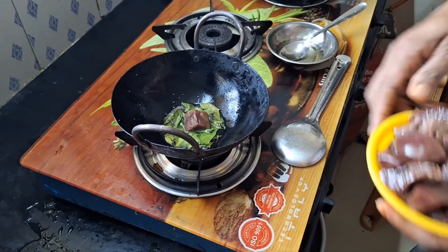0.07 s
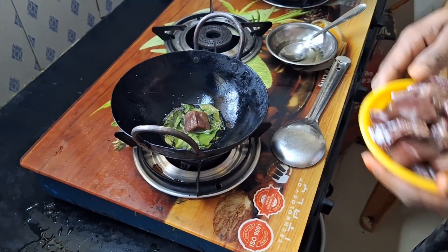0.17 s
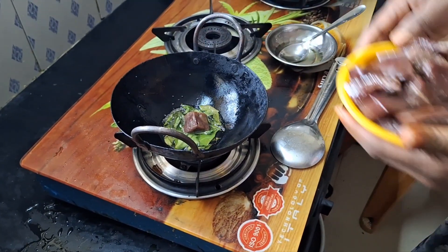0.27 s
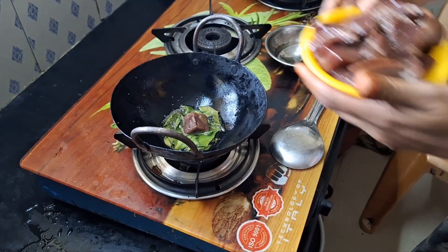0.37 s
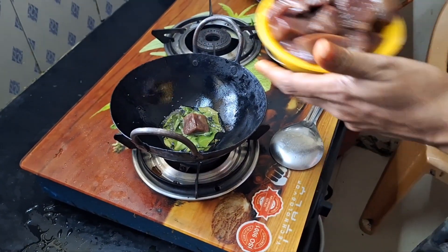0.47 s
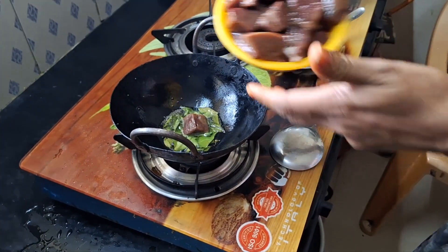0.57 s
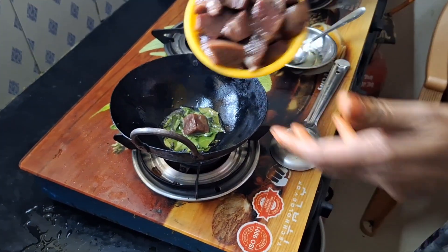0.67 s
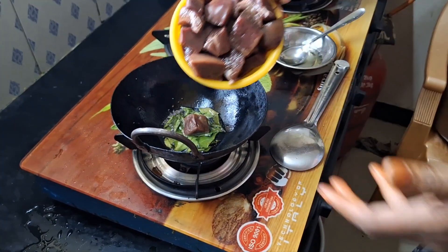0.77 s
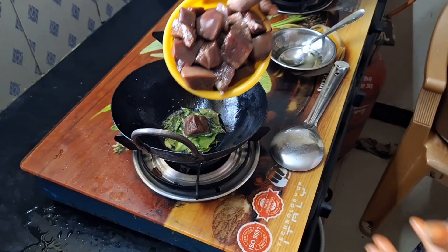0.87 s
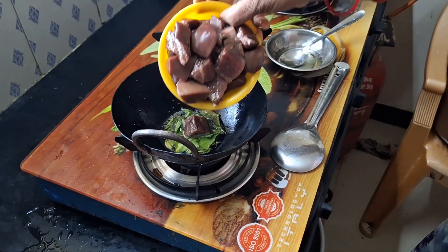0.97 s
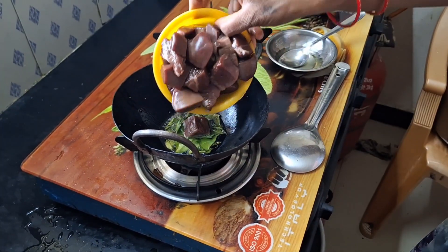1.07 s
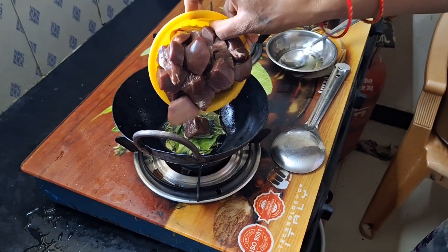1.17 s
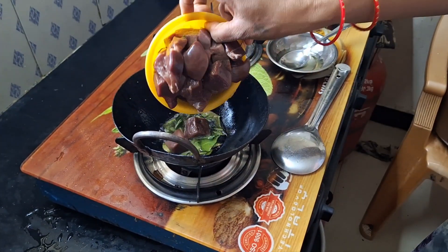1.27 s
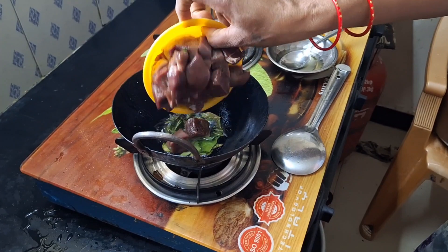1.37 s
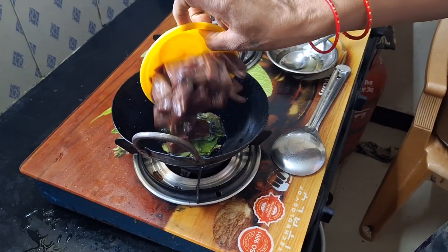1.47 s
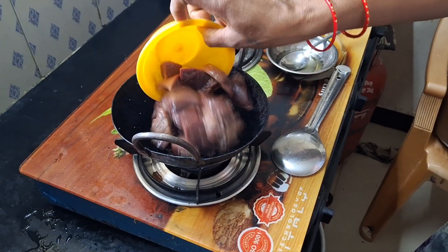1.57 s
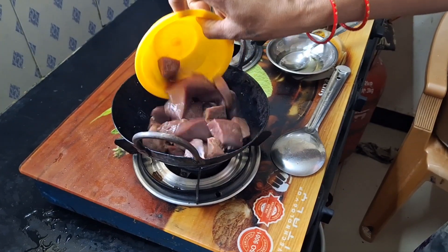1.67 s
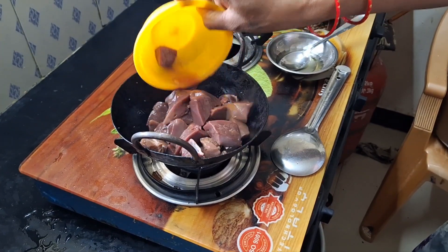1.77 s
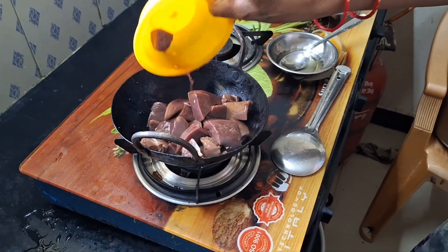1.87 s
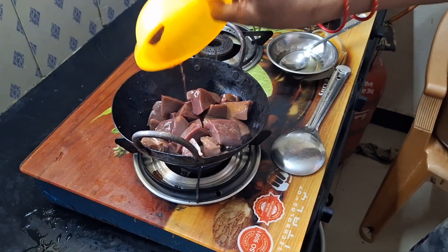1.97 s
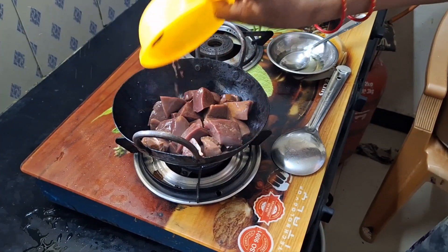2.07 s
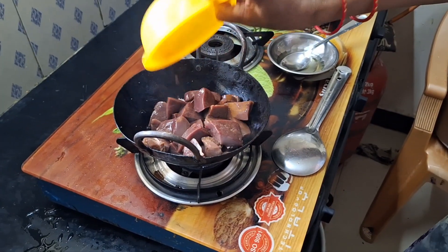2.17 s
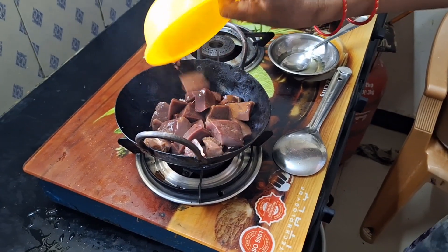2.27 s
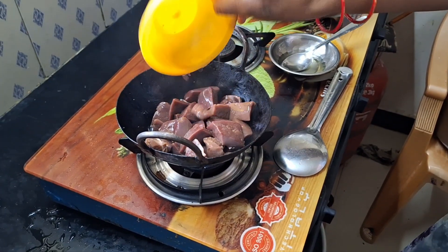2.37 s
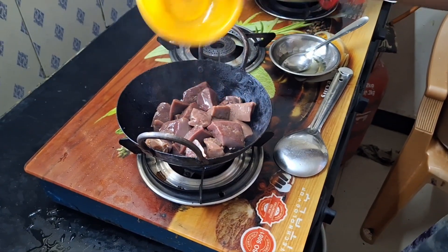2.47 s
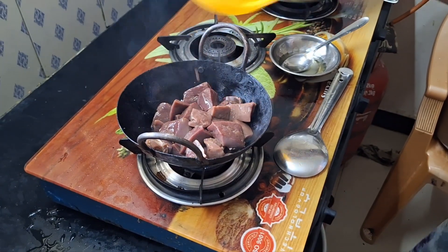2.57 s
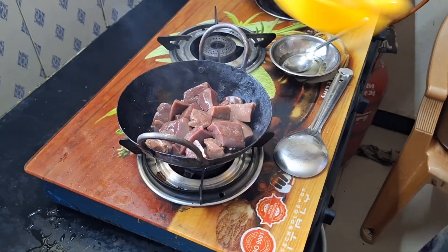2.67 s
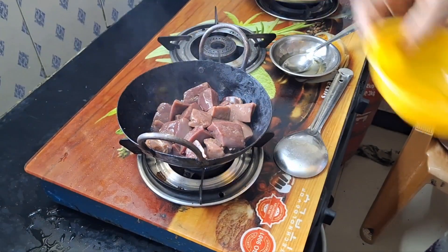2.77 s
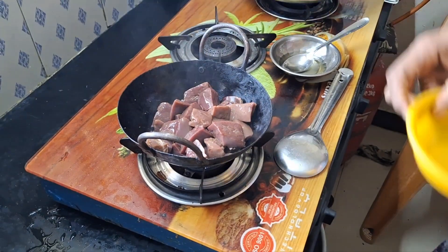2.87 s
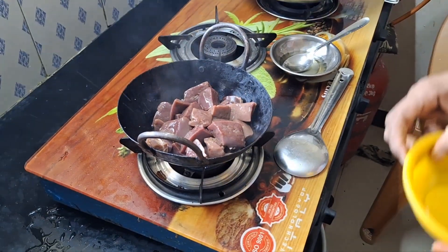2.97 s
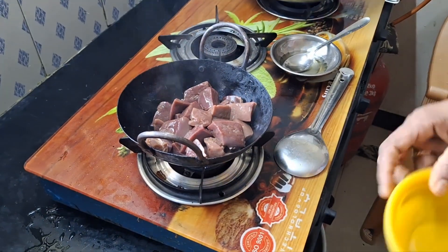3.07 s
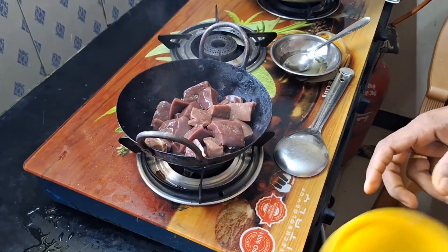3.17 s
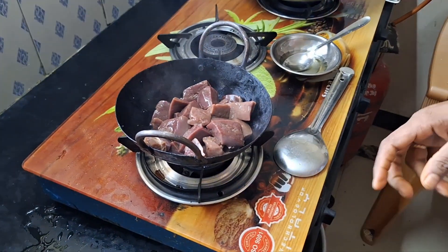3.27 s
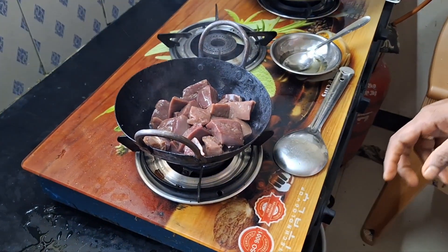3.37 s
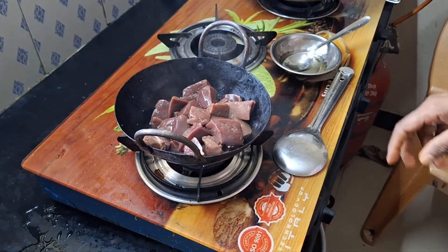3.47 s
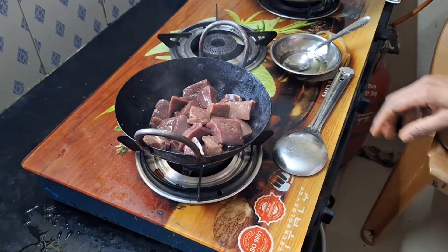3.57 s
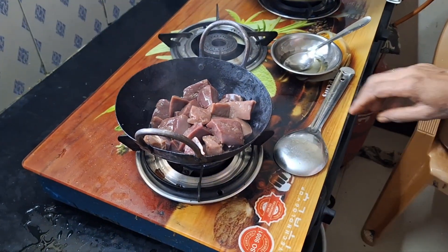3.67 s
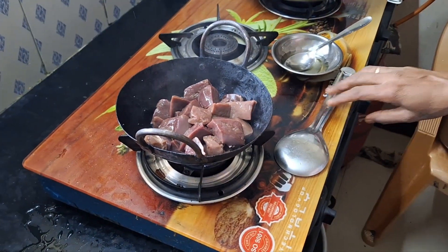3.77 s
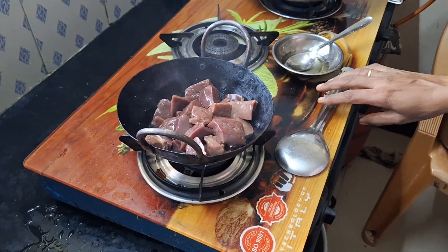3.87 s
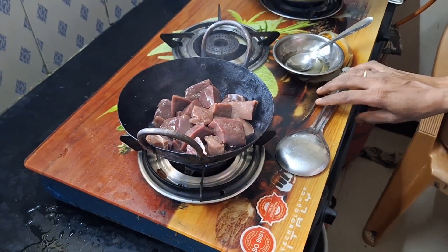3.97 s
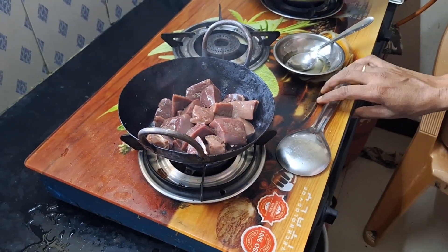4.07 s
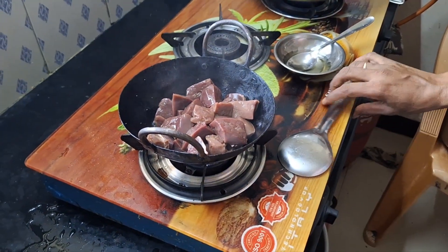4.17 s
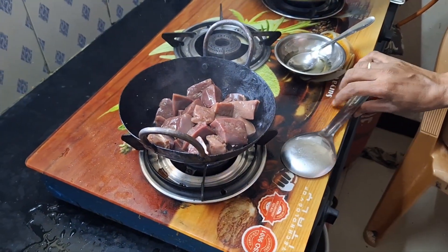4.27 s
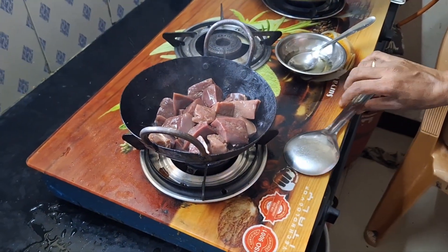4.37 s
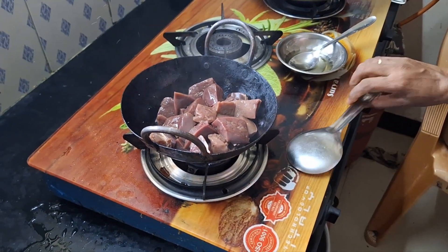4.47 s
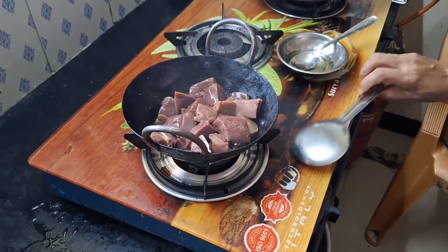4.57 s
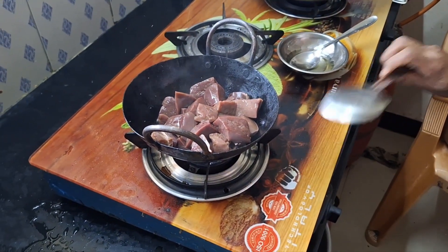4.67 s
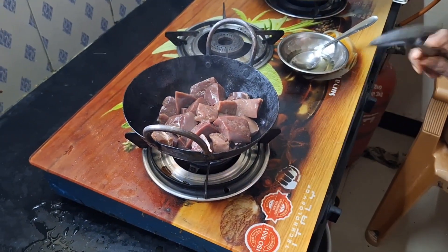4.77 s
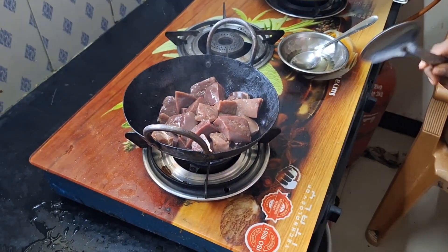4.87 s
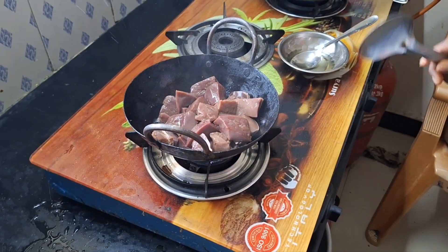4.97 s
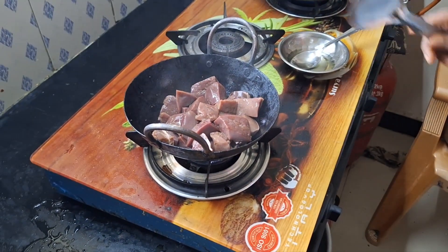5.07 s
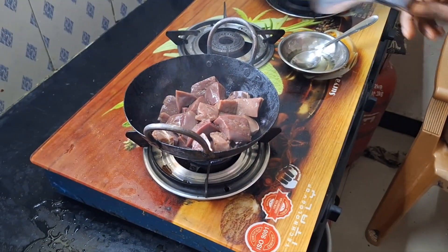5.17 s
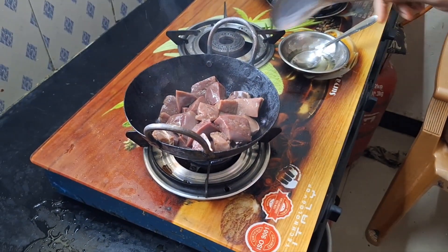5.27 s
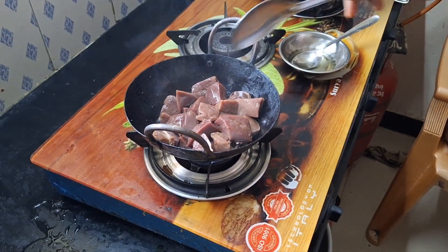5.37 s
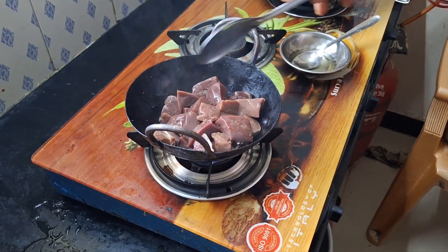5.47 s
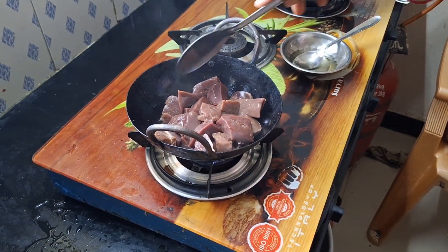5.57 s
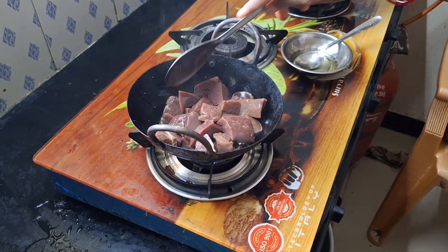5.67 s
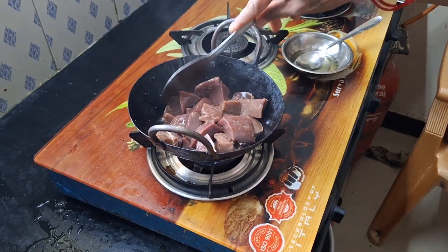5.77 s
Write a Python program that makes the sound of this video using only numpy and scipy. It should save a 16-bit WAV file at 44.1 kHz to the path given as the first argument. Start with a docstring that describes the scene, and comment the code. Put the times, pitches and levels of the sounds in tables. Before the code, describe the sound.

Hot oil ticks and spits single pops in an iron wok over the low hum of a small kitchen. Pieces of raw meat slide in from a bowl and land with a wet slap, bursting into a loud, dense sizzle. The frying carries on close by with sharp pops and bubbling plops, easing slightly, while the bowl gives a few dull knocks.

```python
"""Single pops spit from hot oil in an iron wok, over the low hum of a small kitchen.
Then pieces of raw liver slide from a bowl and land with a wet slap. Their water flashes into steam,
making a dense sizzle that slowly calms, with plops of large bubbles and a few knocks of the bowl.
Every burst rattles round the wok and rings briefly in the room. An automatic gain control
turns everything down while the frying is loud, so the hum sinks."""
import sys
import numpy as np
from scipy import signal
from scipy.fft import rfft, irfft
from scipy.io import wavfile

SR = 44100
rng = np.random.default_rng(int(sys.argv[2]) if len(sys.argv) > 2 else 0)


def dump_mix(stems):
    """Bounce the given channels to the path in sys.argv[1] as a 16-bit WAV at rate SR."""
    frames = np.atleast_2d(stems).T  # one column per channel
    limited = np.clip(frames, -1, 1)  # hard clip at full scale
    pcm = np.round(limited * 32767).astype(np.int16)
    wavfile.write(sys.argv[1], SR, pcm)


N = 257233
TIME, HZ = np.arange(N) / SR, np.fft.rfftfreq(N, 1 / SR)


# Loudness of the sizzle over time, with two brief dips in level. Columns: time_s, level_db
SIZZLE_LOUDNESS = [(1.5, -47), (1.56, -32.5), (1.62, -30), (1.65, -16), (1.72, -16.5), (1.94, -17.5),
                   (1.98, -23.5), (2.04, -18), (2.19, -19.5), (2.24, -17), (2.34, -19.5), (2.39, -16.5),
                   (2.6, -17), (2.8, -17.5), (3.16, -17.5), (3.23, -20), (4.49, -20.5), (4.61, -23.5),
                   (4.65, -19), (4.71, -22.5), (4.74, -26), (4.78, -22.5), (4.96, -20), (5.41, -23),
                   (5.83, -22)]
def sizzle(landing_s=1.648, flash_fade_s=0.031, pool_full_s=2.25):
    """Water boils out of the meat: thin films snap, bubbles ring and steam squeaks."""
    level_db = np.interp(TIME, *np.transpose(SIZZLE_LOUDNESS), left=-100) + 0.4 * drift(20)
    snaps = in_wok(clicks(8000, spread_db=4.2))
    rings = in_wok(bubbles(389, 16170, spread_db=3.0, cycles=4.3, glide=0.062, count=24000))
    squeaks = in_wok(bubbles(940, 8510, spread_db=1.8, cycles=12.0, glide=0.031, count=600))
    frying = amp(-3.5) * snaps + amp(-3) * rings + amp(-12.5) * squeaks
    frying *= amp(0.7 * drift(45))  # steam escapes from under the meat in spurts
    # Large, low bubbles grow louder as juice gathers under the meat.
    pool_db = np.interp(TIME, [landing_s, pool_full_s], [-3.5, 0])
    frying += (amp(pool_db) - 1) * below(frying, 1400)
    # The wet surface flashes into fine fizz as it lands; the coarse bubbling comes in lumps.
    flash_db = 5 * np.exp(-since(landing_s) / flash_fade_s) * (TIME > landing_s)
    coarse = below(frying, 3500)
    coarse_db = -0.49 + 0.31 * flash_db + 0.94 * drift(21)
    frying = amp(coarse_db) * coarse + amp(0.5 + flash_db) * (frying - coarse)
    return spread_over_wok(amp(level_db) * frying, rattle_db=6.5, room_db=9.5)


def bubbles(low_hz, high_hz, spread_db, cycles, glide, count):
    """Steam bubbles ring as they burst, each with its own pitch, fade and slide in pitch."""
    when, pitch, life, bend, size = rng.random((count, 5)).T
    hz = low_hz + (high_hz - low_hz) * pitch
    fade_s = cycles * (0.086 + life) / hz
    height = strength(size, spread_db) / np.sqrt(fade_s)
    length = (4 * fade_s * SR).astype(int) + 1
    # Compute all bubbles end to end, then move each to its own start.
    which = np.repeat(np.arange(count), length)
    step = np.arange(len(which)) - (np.cumsum(length) - length)[which]
    age = step / SR / fade_s[which]
    slide = 1 + glide * (2 * bend[which] - 1) * age
    chirps = height[which] * np.sin(2 * np.pi * hz[which] * step / SR * slide) * np.exp(-age)
    start = (when * N).astype(int)
    return unit(np.bincount(start[which] + step, chirps, N)[:N])


# The tone of frying, from bass to treble. Columns: pitch_hz, level_db
FRYING_TONE = [(150, -58), (330, -22), (480, -10), (850, -12.5), (1080, -6.5), (1400, -7.5), (1700, -5.5),
               (2500, -0.7), (3100, -1.9), (3800, -1.5), (5800, -0.6), (7900, -0.5), (8700, -3.5),
               (10000, -1.5), (13000, -4.5), (16000, -6.5)]
# Pitches at which the hollow of the wok rings. Columns: pitch_hz, width_hz, level_db
WOK_RINGS = [(676, 36, -3), (1067, 73, -1), (1176, 78, -4.5), (2030, 130, -11.5), (2470, 260, -10)]
def in_wok(x):
    """Gives a sound the tone of frying; the hollow of the wok lifts a few pitches."""
    x = colour(x, FRYING_TONE)
    return unit(x + sum(amp(db) * ring(x, hz, width_hz) for hz, width_hz, db in WOK_RINGS))


# Water drops bursting in the oil. A width_ratio is the ring's width divided by its pitch:
# the smaller, the clearer the note. Columns: start_s, puff_db, pitch_hz, width_ratio, spray_s, crack_db
WATER_DROPS = [(.003, -18, 2660, 0.39, .005, -27), (.011, -17.5, 2540, 0.18, 0.0023, -29),
               (.056, -26, 6700, 0.43, .0022, -37), (0.1824, -16, 4100, 0.45, 0.001, -19),
               (0.3057, -17.5, 2170, 0.57, 0.0022, -27), (.338, -11.5, 2130, .65, 0.00064, -25.5),
               (.347, -17, 3940, 0.12, .002, -37), (.380, -12.5, 2430, 0.34, 0.0056, -21),
               (.381, -13, 8300, 0.25, 0.012, -25), (.439, -30, 12000, .5, .002, -22),
               (.504, -32, 8000, .5, .001, -30.5), (.564, -21, 7300, 0.2, .003, -42),
               (.587, -19.5, 2290, 0.54, 0.0048, -30), (.692, -17.5, 2600, 0.65, 0.0032, -26),
               (.721, -31, 7000, 0.35, .002, -45), (.791, -27, 9400, 0.25, 0.0033, -39),
               (.817, -11, 4200, 0.65, 0.0015, -26), (.845, -16.5, 3800, 0.8, .007, -21),
               (.921, -21, 9400, .5, 0.00099, -11.5), (1.189, -46, 5000, .5, 0.0009, -30),
               (1.2493, -42, 6000, .5, 0.00054, -18), (1.3152, -39, 7000, .5, 0.0006, -17),
               (1.5, -21, 6550, 0.29, .005, -35), (1.533, -20, 2720, .3, .004, -34),
               (1.552, -20.5, 2440, .5, 0.0027, -26), (1.563, -20, 12000, .5, .001, -25),
               (1.725, -8, 2300, 0.15, 0.0018, -25), (1.961, -1.5, 3780, 0.46, .002, -18),
               (2.064, -9, 5800, .4, .001, -9), (2.142, -0.5, 4370, 0.4, 0.0044, -12),
               (2.225, -3, 3800, 0.49, .0015, -25), (2.238, -3.5, 2800, 1.1, .003, -10),
               (2.568, -0.5, 6500, 0.34, 0.0089, -25), (2.594, -1.5, 2480, 0.14, 0.005, -21),
               (3.077, -2, 5800, 0.3, 0.0012, -18), (3.121, -2.5, 3100, 0.85, 0.0013, -13),
               (3.577, -2.5, 2850, 0.39, .004, -11), (3.65, -4.5, 2500, 0.11, .008, -25),
               (3.794, -9, 2000, 0.092, .005, -24), (3.834, -10, 6500, .5, .003, -13),
               (4.015, -10, 2380, 0.18, .003, -25), (4.202, -8, 2640, 0.072, 0.003, -22),
               (4.269, -7, 4350, 0.18, 0.00083, -11), (4.406, -5, 4800, 0.65, 0.0084, -14),
               (4.445, -4.5, 3400, 0.49, .004, -22), (4.64, -12, 2500, 0.37, 0.0054, -22),
               (5.091, -8.5, 2520, 0.14, .005, -28), (5.207, -7.5, 2960, .2, 0.0046, -26),
               (5.507, -6, 4430, 0.37, 0.0047, -22)]
def pops():
    """A drop bursts with a bright crack and a puff of spray that rings the hole left in the oil."""
    sounds = []
    for start_s, puff_db, hz, width_ratio, spray_s, crack_db in WATER_DROPS:
        spray_db = 10 * np.log10(spray_s / 0.0012)  # short bursts snap, long ones puff
        puff = amp(puff_db + 14) * cavity(hz, width_ratio, spray_s, spray_db)
        crack = cavity(hz=8750, width_ratio=2, spray_s=0.39 * spray_s, spray_db=spray_db - 6.5)
        sounds.append((start_s, puff + amp(crack_db + 17) * crack))
    return place(sounds, lowest_hz=910, rattle_db=-2.5, room_db=0.0)


# Wet slaps and large steam bubbles. Columns: start_s, level_db, pitch_hz, width_ratio
WET_BLOWS = [(1.266, -11, 1240, 0.16), (1.6063, 0.5, 1250, 0.45), (1.616, -4, 2780, .17),
             (1.87, -13, 1160, .2), (2.194, -5, 940, .6), (2.454, -14, 1120, 0.18), (2.852, -5, 1150, 0.18),
             (3.153, -8, 1170, .2), (4.572, -17, 750, 0.41), (4.904, -5, 796, 1), (4.922, -25, 900, .8),
             (5.619, -7.5, 1080, 0.47)]
def plops(splutter_cycles=1.8):
    """Meat slaps the iron and steam bubbles up under it; larger, lower bubbles splutter longer."""
    sounds = [(start_s, amp(db + 5) * cavity(hz, width_ratio, splutter_cycles / hz, spray_db=3.0))
              for start_s, db, hz, width_ratio in WET_BLOWS]
    return place(sounds, lowest_hz=258, rattle_db=-8.0, room_db=-2.5)


def simmer(touch_s=1.245, hold_s=0.18, fade_s=0.088):
    """Oil ticks thinly round the leaves in it, and flares into a crackle at the first touch of meat."""
    tick_tone = [(300, -28), (1000, -1), (2000, -5), (7000, -1.5), (16000, -6.5)]  # pitch_hz, level_db
    crackle_tone = [(1000, -29), (3000, -8), (6500, -1), (16000, -2)]
    ticks = unit(colour(clicks(1800, spread_db=5.0), tick_tone))
    crackle = unit(colour(clicks(260, spread_db=3.0), crackle_tone))
    flare = amp(-38.5) * (TIME > touch_s) * np.exp(-since(touch_s + hold_s) / fade_s)
    ticks *= np.hypot(amp(-47.5), flare)  # a quiet, steady level plus the flare
    crackle *= amp(-2.5) * flare
    return (spread_over_wok(ticks, rattle_db=5.5, room_db=7.0, spots=6)
            + spread_over_wok(crackle, rattle_db=-4.0, room_db=-4.0, spots=3))


# Bumps of the bowl. Columns: start_s, level_db, pitch_hz, width_ratio
BOWL_BUMPS = [(.002, -26, 381, 0.02), (0.338, -23.5, 327, 0.036), (.57, -28, 290, 0.095),
              (0.817, -36, 279, 0.24), (2.38, -23, 290, .4), (2.731, -26, 280, 0.36)]
def knocks(contact_s=0.0016):
    """Handling the bowl makes dull knocks that each ring on one low pitch."""
    sounds = [(start_s, amp(db + 11.5) * cavity(hz, width_ratio, contact_s, spray_db=-19.0))
              for start_s, db, hz, width_ratio in BOWL_BUMPS]
    return place(sounds, lowest_hz=190, rattle_db=-12.0, room_db=-16.5)


# The tones of a motor. Columns: pitch_hz, level_db, waver_ratio (0 is steady)
MOTOR_TONES = [(100.1, -39.5, 0.14), (147.1, -44.5, 0)]
# Low pitches at which the room booms. Columns: pitch_hz, width_hz, level_db
ROOM_BOOMS = [(62.2, 1.8, -0.5), (52.7, 4.2, -7.5), (109.5, 2.5, -3)]
# The tone of the room's soft noise. Columns: pitch_hz, level_db
AIR_TONE = [(20, -13), (45, -18), (95, 4.5), (150, 2), (250, -6), (400, -11.5), (800, -19.5), (2000, -32),
            (6000, -38), (16000, -41)]
def hum():
    """A motor hums two low tones over the rumble and soft noise of the room."""
    tones = np.zeros(N)
    for hz, db, waver_ratio in MOTOR_TONES:
        waver = 1 + waver_ratio * (drift(3.5) + 1j * drift(4.3))  # in both level and phase
        tones += np.sqrt(2) * amp(db) * (waver * np.exp(2j * np.pi * hz * TIME)).real
    stir = rng.standard_normal(N) + 0.87 * rng.standard_normal((2, N))  # shared, plus some for each ear
    rumble = sum(amp(db) * unit(ring(stir, hz, width_hz)) for hz, width_hz, db in ROOM_BOOMS)
    air_gain = amp(curve_at(AIR_TONE, HZ))
    shared, left, right = (unit(irfft(rfft(x) * air_gain, N)) for x in rng.standard_normal((3, N)))
    air = shared + 0.63 * np.array([left, right])
    lean_left = amp([[0.6], [-0.6]])
    return lean_left * (amp(-0.2) * tones + amp(-54) * rumble + amp(-49.5) * air)


# How long the room's echo takes to fade by 60 dB. Columns: pitch_hz, fade_s
ROOM_FADE = [(200, 0.24), (1000, 0.24), (4000, 0.35), (9000, 0.26), (16000, 0.18)]
def echoes(x, rattle_db, room_db, rattle_s=0.0039):
    """Sound from one spot arrives directly, then bounces off the iron, then round the room."""
    t = np.arange(SR // 3) / SR
    rattle, room = rng.standard_normal((2, 2, len(t)))
    rattle *= np.exp(-t / rattle_s) * (t > 0.0003)
    hz, age_s, spectrum = signal.stft(room * (t > 0.003), SR, nperseg=256)
    spectrum *= amp(-60 * age_s / curve_at(ROOM_FADE, hz)[:, None])
    room = signal.istft(spectrum, SR, nperseg=256)[1][:, :len(t)]
    paths = amp(rattle_db) * unit(rattle) + amp(room_db) * unit(room)
    paths[[0, 1], [0, 6]] += np.sqrt(len(t))  # the direct sound reaches the left 6 samples sooner
    return signal.fftconvolve(x[None], unit(paths) / np.sqrt(len(t)), axes=1)


def spread_over_wok(x, rattle_db, room_db, spots=22):
    """Shares a sound among many spots of the wok; the liveliest spot keeps changing."""
    shares = np.array([amp(23.2 * drift(63)) for _ in range(spots)])
    shares /= np.linalg.norm(shares, axis=0)
    return sum(echoes(x * share, rattle_db, room_db)[:, :N] for share in shares)


def place(sounds, lowest_hz, rattle_db, room_db):
    """Plays each (start_s, sound) from a spot of its own and trims away the bass."""
    mix = np.zeros((2, N))
    for start_s, sound in sounds:
        heard = echoes(sound, rattle_db, room_db, rattle_s=0.0019)
        start = round(start_s * SR)
        mix[:, start:start + heard.shape[1]] += heard[:, :N - start]
    return signal.sosfilt(signal.butter(2, lowest_hz, "high", fs=SR, output="sos"), mix)


def cavity(hz, width_ratio, spray_s, spray_db, size=4096):
    """One push and a dying spray of noise make a small hollow ring."""
    t = np.arange(size) / SR
    push = amp(spray_db) * unit(rng.standard_normal(size) * np.exp(-t / spray_s)) / np.sqrt(size)
    push[0] += 1
    burst = ring(push, hz, hz * width_ratio)
    burst = ring(burst, hz, hz * 18)  # softens the far bass and treble
    return burst / np.linalg.norm(burst)


def clicks(per_s, spread_db):
    """Clicks at random moments."""
    chance, size, sign = rng.random((3, N))
    return (chance < per_s / SR) * np.sign(sign - 0.5) * strength(size, spread_db)


def strength(draw, spread_db):
    """Turns random numbers from 0 to 1 into burst sizes: many small, a few large."""
    return amp(spread_db * np.minimum(-np.log(1 - draw), 5))


def drift(rate_hz, size=8192):
    """Smooth random wandering of about size 1; a higher rate wanders faster."""
    step_s = N / SR / size
    smoothing = np.exp(-(np.fft.rfftfreq(size, step_s) / rate_hz) ** 2)
    wander = irfft(rfft(rng.standard_normal(size)) * smoothing)
    return np.interp(TIME, np.arange(size) * step_s, unit(wander))


def colour(x, tone, size=2048):
    """Shapes a sound with a (pitch_hz, level_db) curve so that clicks keep a sharp start."""
    log_gain = np.log(amp(curve_at(tone, abs(np.fft.fftfreq(size, 1 / SR)))))
    taps = np.fft.ifft(np.exp(np.conj(signal.hilbert(log_gain)))).real
    return signal.oaconvolve(x, taps[:size // 2])[:len(x)]


def ring(x, hz, width_hz):
    """Rings at one pitch; the narrower the width, the longer it lasts."""
    sharpness = hz / min(width_hz, SR / 3)
    return signal.lfilter(*signal.iirpeak(min(hz, SR * 0.45), sharpness, SR), x)


def below(x, hz):
    """The part of a sound under a pitch."""
    return signal.sosfiltfilt(signal.butter(3, hz, fs=SR, output="sos"), x)


def curve_at(points, hz):
    """Reads between the rows of a (pitch_hz, value) table."""
    pitches, values = np.transpose(points)
    return np.interp(np.log(hz + 1), np.log(pitches + 1), values)


def since(start_s):
    """Seconds since start_s; zero before it."""
    return np.maximum(TIME - start_s, 0)


def amp(db):
    """Turns decibels into a multiplier."""
    return 10 ** (np.asarray(db) / 20)


def unit(x):
    """Scales a sound to an average power of 1."""
    return x / np.sqrt(np.mean(x ** 2) + 1e-20)


def gain_control(x, threshold_db=-27.5, ratio=1.588, settle_s=0.048):
    """Turns everything down while the frying is loud and back up as it calms."""
    memory = np.exp(-1 / (settle_s * SR))
    power = signal.lfilter([1 - memory], [1, -memory], (x ** 2).mean(0))
    excess_db = np.maximum(10 * np.log10(power + 1e-12) - threshold_db, 0)
    return x / amp(excess_db * (1 - 1 / ratio))


def scene():
    """Frying sounds over the hum of the kitchen."""
    return hum() + simmer() + sizzle() + plops() + knocks() + pops()


# How much louder the left microphone is than the right. Columns: pitch_hz, left_minus_right_db
MIC_BALANCE = [(250, 3), (500, -0.5), (1000, 5), (1300, -2.5), (2000, 4.5), (2650, -5.5), (3600, -1),
               (4800, -4), (6800, -1), (7900, -2.5), (8600, -2.5), (9500, -5), (11500, -7.5), (14000, 0)]
def record(dry, top_hz=16000):
    """Each microphone adds its own tone; then come the gain control and a cut of the highest treble."""
    left = colour(dry[0], [(hz, db / 2) for hz, db in MIC_BALANCE])
    right = colour(dry[1], [(hz, -db / 2) for hz, db in MIC_BALANCE])
    treble_cut = signal.firwin(511, top_hz, window=("kaiser", 9), fs=SR)
    return signal.oaconvolve(gain_control(np.array([left, right])), treble_cut[None], "same")


dry = scene()
out = record(dry)
dump_mix(out)
```